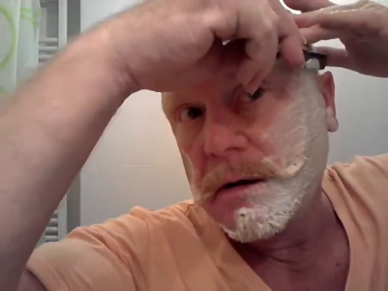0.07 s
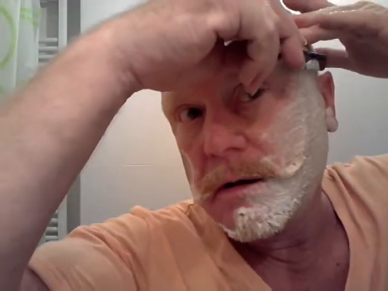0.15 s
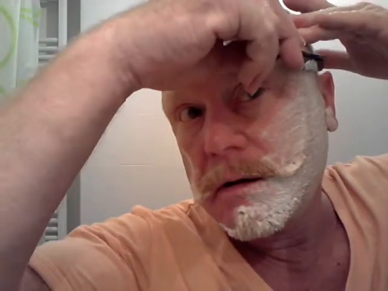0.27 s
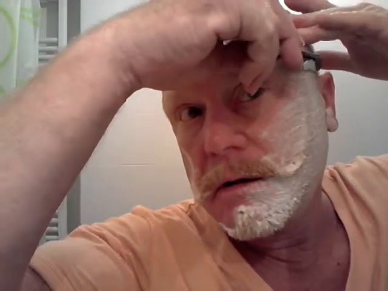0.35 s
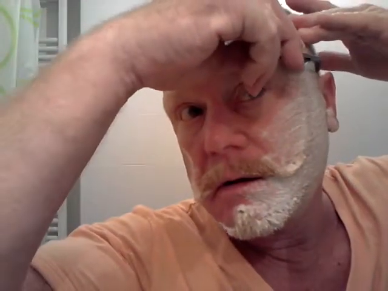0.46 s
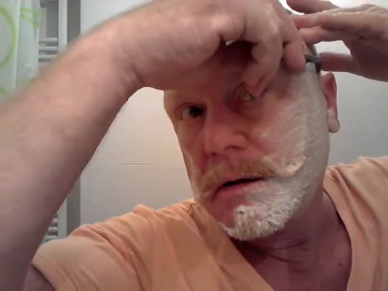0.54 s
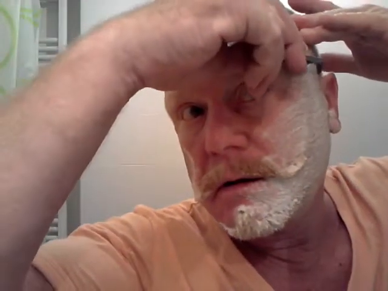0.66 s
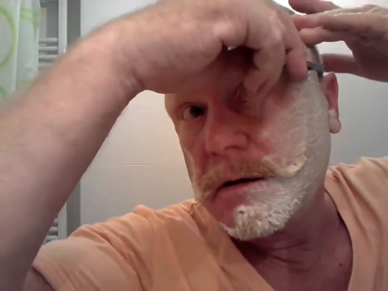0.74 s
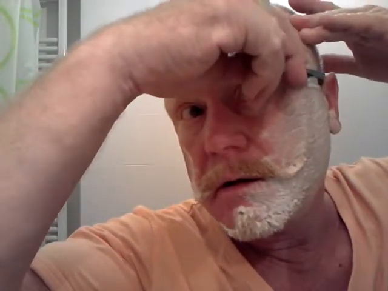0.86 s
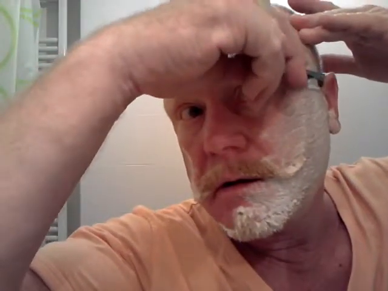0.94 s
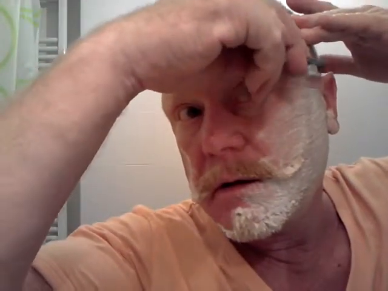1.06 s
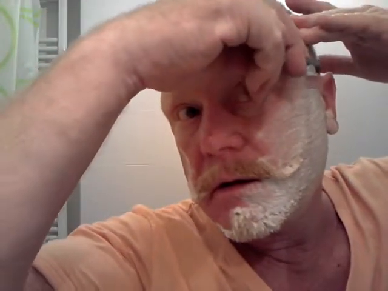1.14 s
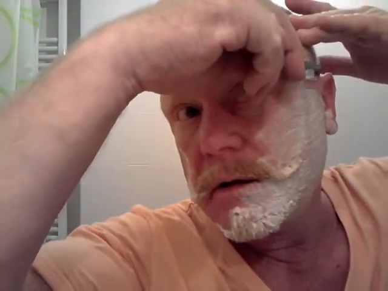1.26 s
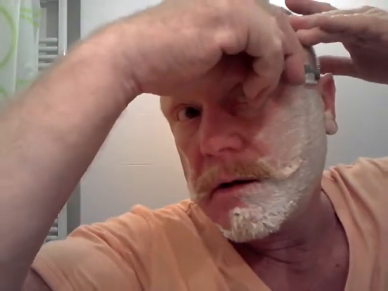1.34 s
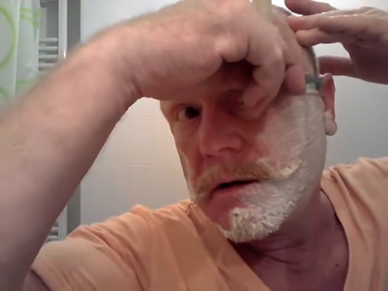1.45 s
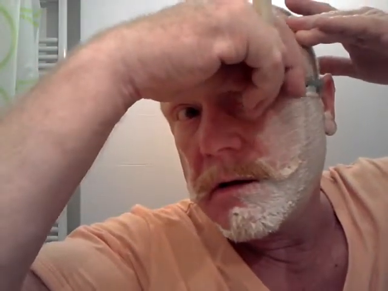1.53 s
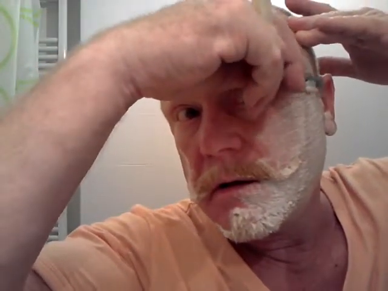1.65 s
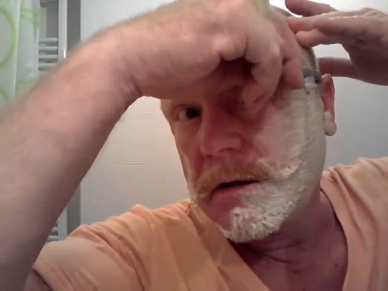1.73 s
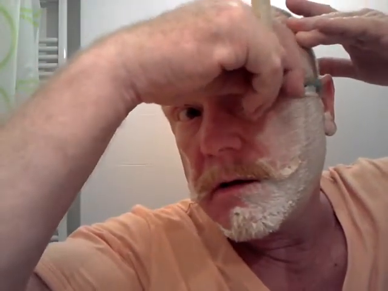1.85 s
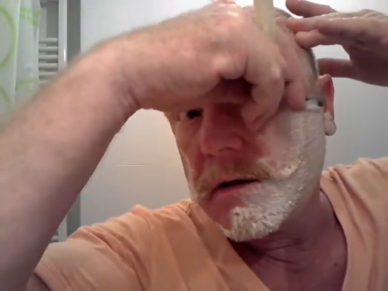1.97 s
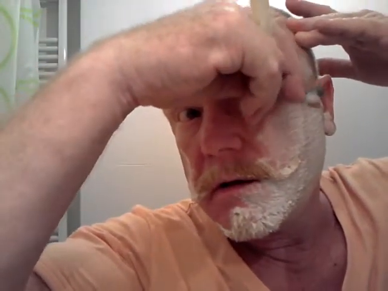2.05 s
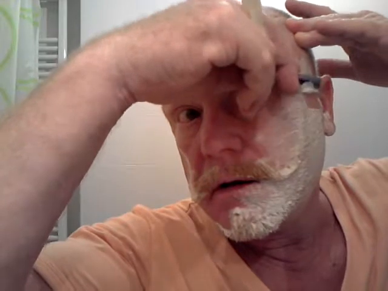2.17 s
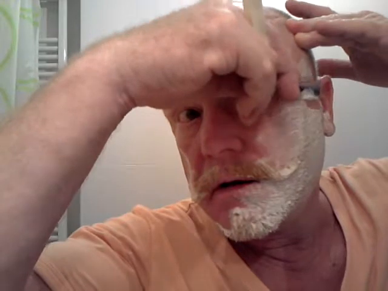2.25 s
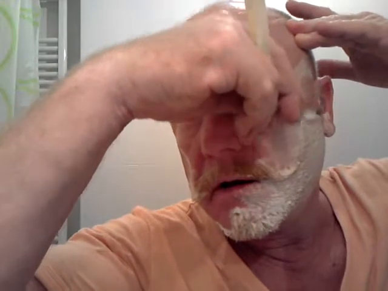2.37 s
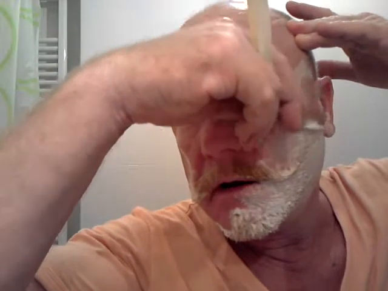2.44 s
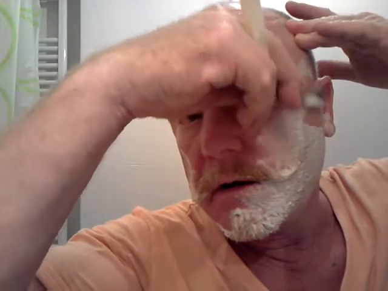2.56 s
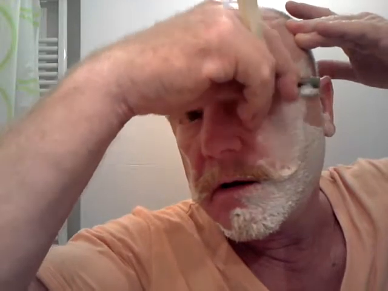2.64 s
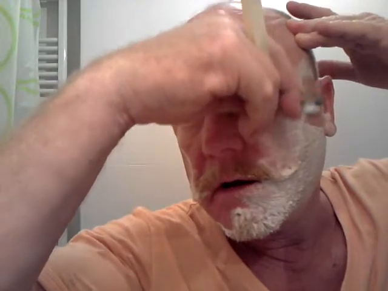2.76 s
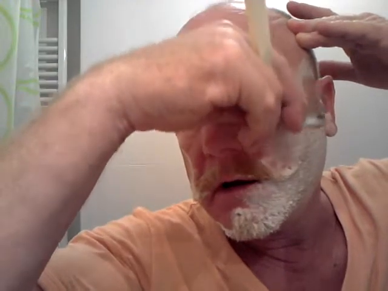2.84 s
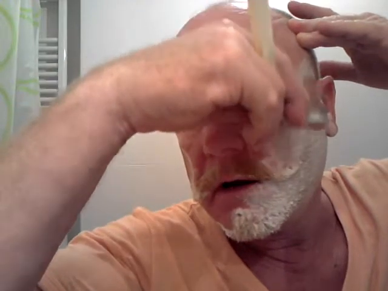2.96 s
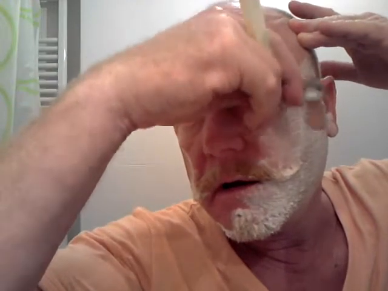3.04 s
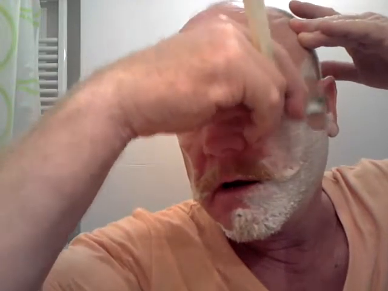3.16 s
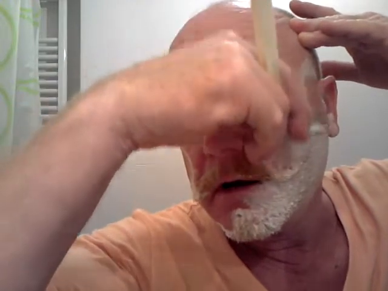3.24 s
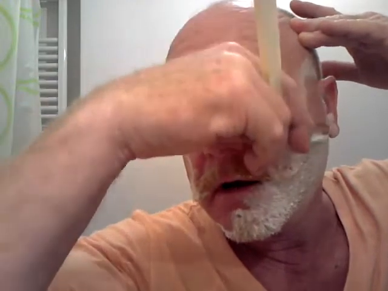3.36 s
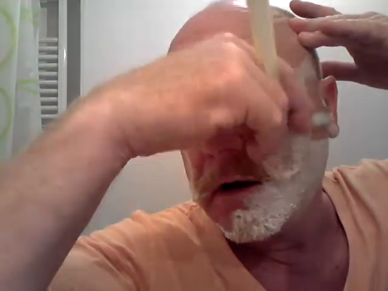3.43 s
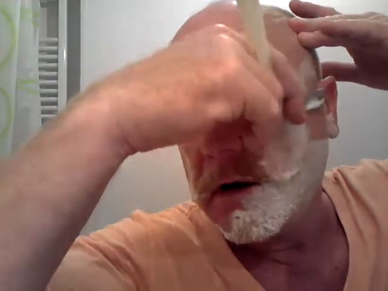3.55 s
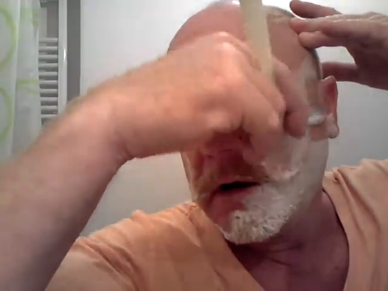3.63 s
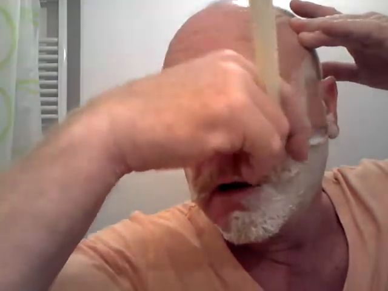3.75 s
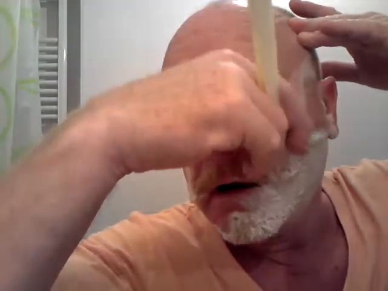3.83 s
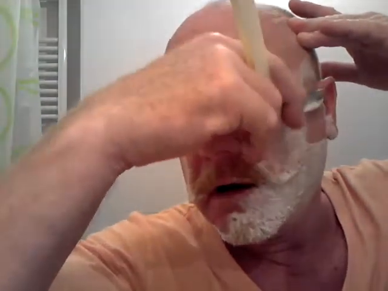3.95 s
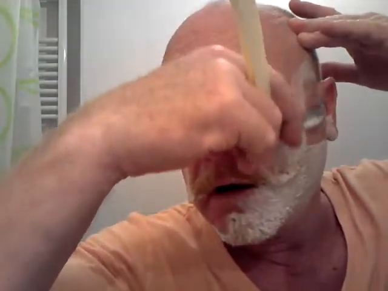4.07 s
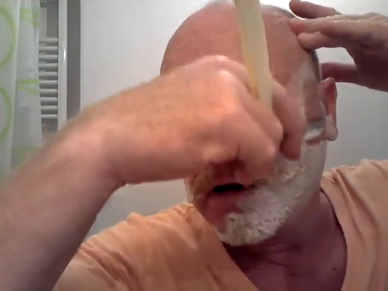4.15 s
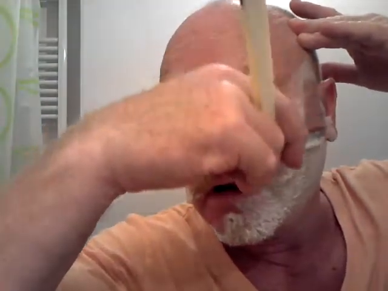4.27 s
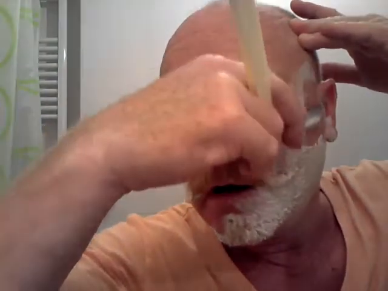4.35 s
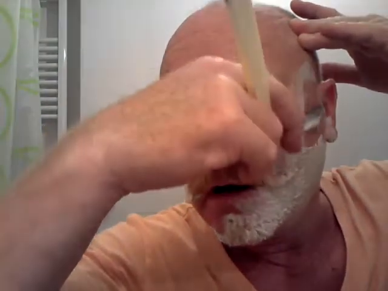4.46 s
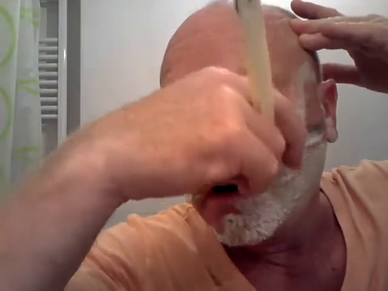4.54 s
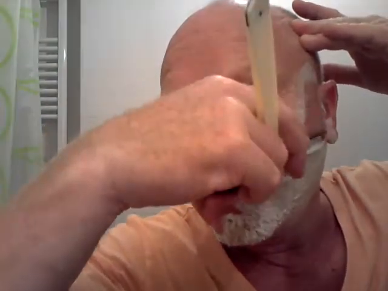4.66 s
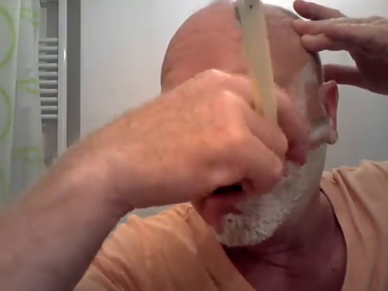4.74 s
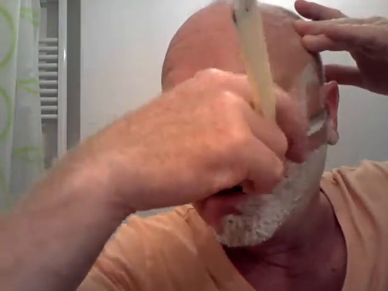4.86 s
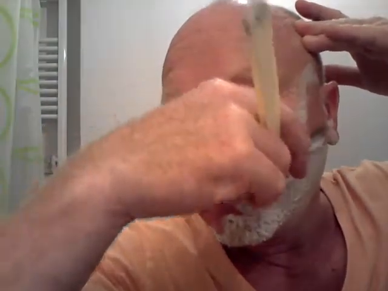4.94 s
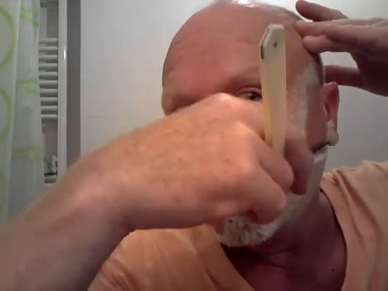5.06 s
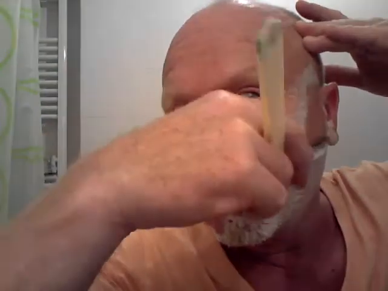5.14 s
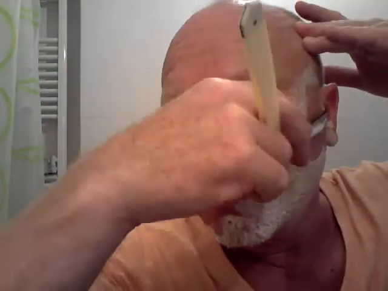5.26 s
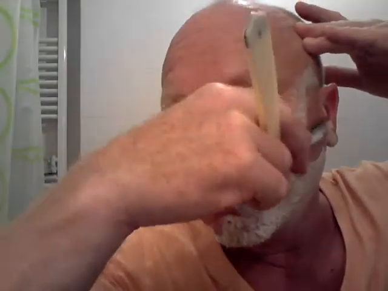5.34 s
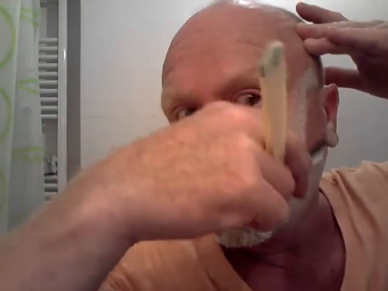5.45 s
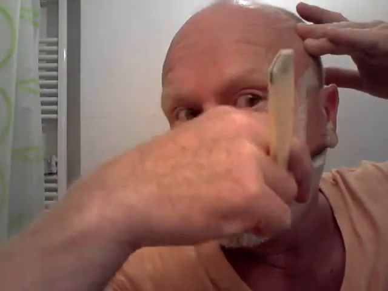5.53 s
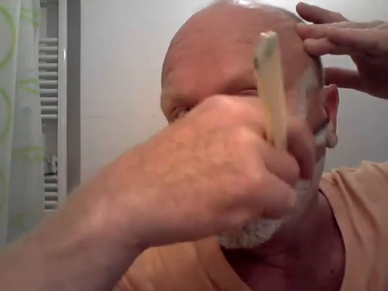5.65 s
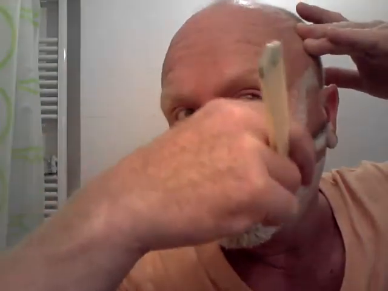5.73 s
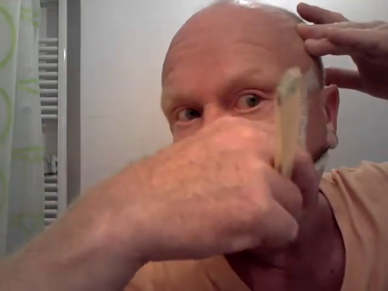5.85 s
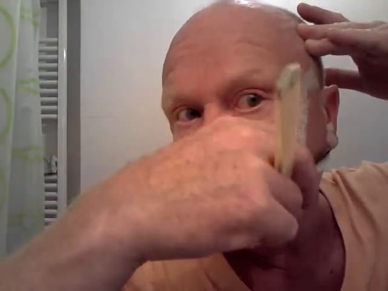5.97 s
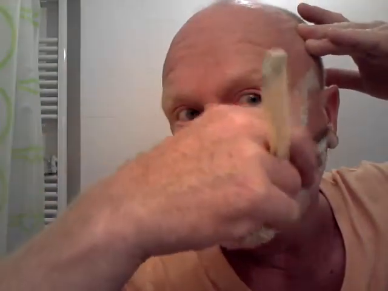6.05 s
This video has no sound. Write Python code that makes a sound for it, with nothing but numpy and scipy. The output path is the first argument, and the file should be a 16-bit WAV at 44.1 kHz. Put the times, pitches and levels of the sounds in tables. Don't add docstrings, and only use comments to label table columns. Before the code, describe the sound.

Dry, crackly razor scrapes, brief at first then longer and regular, with bright tile echo above a soft rush of ventilation and hiss.

```python
import sys
import numpy as np
from scipy import signal
from scipy.fft import rfft, irfft
from scipy.io import wavfile

SR = 44100
rng = np.random.default_rng(int(sys.argv[2]) if len(sys.argv) > 2 else 0)


def inscribe(sig):
    pcm = np.round(np.clip(np.atleast_2d(sig).T, -1, 1) * 32767)
    wavfile.write(sys.argv[1], SR, pcm.astype(np.int16))


def elevation(decibels):
    levels = np.asarray(decibels, float)
    return 10 ** (levels / 20)


N = 269010


def rms_one(x):
    return x / np.sqrt(np.mean(x ** 2) + 1e-20)


def ears(left_db, right_db):
    return elevation(np.array([[left_db], [right_db]]))


def at_hz(points, hz):
    point_hz, point_db = np.array(points).T
    return np.interp(np.log(hz), np.log(point_hz), point_db)


def resonate(x, hz, width_hz):
    r = np.exp(-np.pi * width_hz / SR)
    feedback = [1, -2 * r * np.cos(2 * np.pi * hz / SR), r * r]
    return signal.lfilter(np.array([1, 0, -1]) * (1 - r * r) / 2, feedback, x)


def resonate_twice(x, hz, width_hz):
    return resonate(resonate(x, hz, width_hz), hz, width_hz)


def tiles(x, t60_s, gap_s):
    t = np.arange(SR // 2) / SR
    fade = elevation(-60 * t / t60_s) * np.clip(t / gap_s, 0, 1)
    tail = rng.standard_normal((2, len(t))) * fade
    tail = tail / np.sqrt(np.sum(tail ** 2, axis=1, keepdims=True))
    return signal.fftconvolve(x, tail, axes=1)[:, :x.shape[1]]


# pitch in Hz, level in dB per Hz.
VENT_COLOR = [(20, -19.5), (60, -19.5), (100, -12.5), (200, -10.5), (300, -8), (520, -8.5), (650, -10),
              (800, -6.5), (1300, -9), (1750, -6), (2400, -9.5), (3100, -17.5), (4200, -27), (8000, -50)]
# pitch in Hz, left minus right in dB.
VENT_TILT = [(40, 0.5), (150, 5.5), (300, -2), (700, -1.5), (1300, -3.5), (2500, 1)]
# pitch in Hz, width in Hz, left level in dB, right level in dB.
ROOM_HUMS = [(190.3, 8.1, -68.5, -85.5), (363, 4.8, -72.5, -72.5), (493, 12, -67, -70.5),
             (522.5, 6.6, -70.5, -74.5), (552, 6.5, -69.5, -69.5), (814, 4.6, -70.5, -77),
             (988, 18, -69.5, -66.5), (1132.5, 16, -62.5, -72), (1344, 16, -76.5, -80),
             (1610, 29, -67.5, -69), (1668, 47, -74.5, -62.5), (1744, 10, -62.5, -65)]
VENT_DB = -55.5


def vent():
    size = N + SR
    hz = np.maximum(np.fft.rfftfreq(size, 1 / SR), 10)
    source = rng.standard_normal((1, size))
    diffuse = rng.standard_normal((2, size))
    shared = tiles(source * np.ones((2, 1)), t60_s=0.4, gap_s=0.0044)
    shared = shared + 1.8 * resonate(source, 340, 380)
    no_rumble = signal.butter(2, 190, "high", fs=SR, output="sos")
    shared = signal.sosfilt(no_rumble, shared)
    color_db = at_hz(VENT_COLOR, hz) + at_hz(VENT_TILT, hz) * np.array([[0.5], [-0.5]])
    colored = irfft(rfft(shared + 1.36 * diffuse) * elevation(color_db), size)
    air = elevation(VENT_DB + 5.0) * rms_one(colored[:, SR:])
    for hum_hz, width_hz, left_db, right_db in ROOM_HUMS:
        hum = rms_one(resonate_twice(source[0], hum_hz, width_hz)[SR:])
        air = air + hum * ears(left_db, right_db)
    return air


def drift(rate_hz):
    r = np.exp(-2 * np.pi * rate_hz / SR)
    wander = signal.lfilter([1], [1, -2 * r, r * r], rng.standard_normal(N + SR))
    return rms_one(wander[SR:])


# peak time in seconds, half length in seconds, level in dB.
DRONE_SWELLS = [(0.257, 0.12, -62), (0.67, 0.093, -67), (1.127, 0.19, -60), (1.704, 0.067, -61.5),
                (1.98, .08, -66), (2.55, .2, -64.5), (2.88, 0.15, -59), (3.41, 0.13, -63),
                (4.076, 0.081, -64), (4.5, 0.25, -62), (5.61, 0.04, -67.5), (5.86, 0.074, -62.5)]
CALM_DB = -69


def drone():
    t = np.arange(N) / SR
    level = elevation(CALM_DB)
    for peak_s, half_s, db in DRONE_SWELLS:
        level = level + elevation(db) * np.exp(-((t - peak_s) / half_s) ** 2)
    pitch_hz = 275 + 5.3 * drift(7)
    phase = 2 * np.pi * np.cumsum(pitch_hz) / SR
    return level * ears(4, -1) * np.sin(phase)


# time the edge lands in seconds, rise in seconds,
# hold in seconds, level after the rise in dB, level before the lift in dB.
STROKES = [(0.77, 0.059, 0.039, -44.5, -53), (0.918, 0.033, 0.012, -38.5, -43.5),
           (1.21, 0.01, .005, -61, -62.5), (1.299, 0.033, 0.0053, -58.5, -57),
           (1.391, 0.069, 0.19, -47, -51), (1.712, 0.052, 0.012, -54, -55),
           (1.851, 0.0058, 0.041, -47.5, -48), (1.94, 0.046, 0.032, -36, -37),
           (2.163, 0.1, 0.018, -55.5, -55.5), (2.313, 0.096, 0.095, -39, -34.5),
           (2.692, .008, 0.012, -60, -55.5), (2.735, 0.094, 0.16, -42, -39.5),
           (3.171, 0.074, 0.18, -39, -40), (3.629, 0.057, 0.15, -40.5, -39),
           (4.055, 0.052, 0.19, -41.5, -41), (4.409, .018, 0.0064, -50, -48),
           (4.53, 0.037, 0.12, -38.5, -42), (4.765, 0.012, 0.014, -51, -63),
           (4.918, 0.036, 0.17, -40.5, -37), (5.283, 0.019, 0.021, -55.5, -63),
           (5.375, 0.041, 0.17, -38.5, -42), (5.801, 0.011, .17, -39, -40.5), (6.06, 0.04, .02, -60, -61)]
TOUCH_DB, TOUCH_S = -10, 0.004
RISE_POWER, LIFT_DB_PER_S = 0.96, 318
GLIDE_DB, GLIDE_DB_PER_S = -16.5, 84


def pressure_db():
    t = np.arange(0, N, 16) / SR
    level = elevation(-90)
    for start_s, rise_s, hold_s, first_db, last_db in STROKES:
        since = t - start_s
        bite = elevation(TOUCH_DB) * np.clip(since / TOUCH_S, 0, 1)
        swell = np.clip(since / rise_s, 0, 1) ** RISE_POWER
        hold = elevation(np.interp(since - rise_s, [0, hold_s], [first_db, last_db]))
        after = np.maximum(since - rise_s - hold_s, 0)
        lift = elevation(-LIFT_DB_PER_S * after)
        glide = elevation(GLIDE_DB - GLIDE_DB_PER_S * after)
        level = level + np.maximum(bite, swell) * hold * np.maximum(lift, glide)
    return np.interp(np.arange(N) / SR, t, 20 * np.log10(level))


# time in seconds, peak level in dB.
THICK_HAIRS = [(0.832, -37), (0.9233, -34), (0.9477, -29), (1.4194, -31), (1.8557, -36), (1.9744, -36),
               (2.361, -26), (2.4592, -22), (2.701, -42), (2.7455, -30), (2.9615, -20), (3.18, -28),
               (3.4236, -21), (3.4555, -30), (3.6538, -33), (3.694, -24), (3.8314, -24), (4.0782, -36),
               (4.1555, -19), (4.224, -24), (4.2776, -22), (4.4363, -34), (4.561, -20), (4.6792, -33),
               (4.9452, -25), (5.0683, -23), (5.3787, -35), (5.438, -26), (5.8136, -24), (5.9304, -19)]
HAIRS_PER_S = 3200


def hair_snaps(cut_db):
    sizes = elevation(2.9 * np.minimum(rng.exponential(1, N), 5)) * rng.choice([-1, 1], N)
    per_s = np.minimum(HAIRS_PER_S * elevation(2.2 * drift(60)), 9000)
    hairs = sizes * (rng.random(N) < per_s / SR)
    hairs = rms_one(hairs) * elevation(0.7 * drift(29))
    snap_s, peak_db = np.array(THICK_HAIRS).T
    at = np.round(snap_s * SR).astype(int)
    hairs[at] = elevation(np.minimum(peak_db - cut_db[at] + 9, 21))
    return hairs


def body(clicks, modes, scatter_db):
    out, at = 0, np.flatnonzero(clicks)
    for k, (hz, width_hz, left_db, right_db) in enumerate(modes):
        struck = np.full((2, N), 1e-18)
        chance = rng.standard_normal((2, len(at)))
        struck[:, at] = clicks[at] * elevation(scatter_db * chance)
        rung = resonate_twice(struck, hz, 1.7 * width_hz)
        out = out + rung * ears(left_db, right_db) * (-1) ** k
    return rms_one(out)


# pitch in Hz, width in Hz, left level in dB, right level in dB.
SKIN = [(1370, 900, -16.5, -14.5), (2210, 1100, -13.5, -14), (3180, 400, -5, -5.5), (3668, 550, -9, -3.5),
        (4437, 700, -1.5, -1.5), (5147, 700, -4, -1), (5805, 360, -4, -2)]
BLADE = [(6325, 1100, -3, -7), (6680, 610, -3, 2), (7197, 290, -10.5, 4), (7840, 610, -12, -1),
         (8690, 810, -20, -12)]
EDGE = [(9350, 1300, -4.5, 8.5), (10680, 2200, -9.5, 2.5)]
LATHER = [(12300, 1800, -4.5, 0), (13750, 580, -9, 0)]
TEMPLE_S, CHEEK_S = 0.95, 3.68
DRAG_DB, BRIGHT_DB, FIZZ_DB = (-9.5, 0), (-14, -12), (-16.5, -22.5)
HEEL_DB, TIP_DB = (-5.5, -3), (-1.5, -3)
FIRM_DB, BRIGHT_SOFT, FIZZ_SOFT = -41, 0.18, 0.17


def razor():
    t = np.arange(N) / SR
    cut_db = pressure_db()
    hairs = hair_snaps(cut_db)
    lightness_db = FIRM_DB - cut_db

    def ring(modes, places_db, scatter_db, extra_db=0):
        place_db = np.interp(t, [TEMPLE_S, CHEEK_S], places_db)
        return elevation(cut_db + place_db + extra_db) * body(hairs, modes, scatter_db)

    blade = ring(BLADE[:2], HEEL_DB, 5.0) + ring(BLADE[2:], TIP_DB, 4.5)
    skin = ring(SKIN, DRAG_DB, 4)
    edge = ring(EDGE, BRIGHT_DB, 5.0, BRIGHT_SOFT * lightness_db)
    lather = ring(LATHER, FIZZ_DB, 8.0, FIZZ_SOFT * lightness_db + 4.0)
    return blade + skin + edge + lather


def moving_echo(x, count):
    place = np.linspace(0, count - 1, N)
    echo = 0
    for k in range(count):
        nearness = np.sqrt(np.clip(1 - abs(place - k), 0, 1))
        echo = echo + tiles(x * nearness, t60_s=0.26, gap_s=0.00084)
    return echo


LEFT_LAG_S = 9 / 44100


def scene():
    background = vent() + drone()
    near = razor()
    late_left = np.roll(near[0], round(LEFT_LAG_S * SR))
    direct = np.array([late_left, near[1]]) * ears(-3, 0)
    echo = ears(1, -2.5) * moving_echo(near, count=8)
    return background + direct + echo


def roll_off(x):
    return signal.sosfilt(signal.butter(12, 14970, fs=SR, output="sos"), x)


HISS_DB = -65.5


def record(dry):
    hiss = elevation(HISS_DB + 7.5) * rng.standard_normal(dry.shape)
    bright = signal.butter(1, 1500, "high", fs=SR, output="sos")
    heard = dry + signal.sosfilt(bright, hiss)
    return roll_off(heard)


dry = scene()
out = record(dry)
inscribe(out)
```